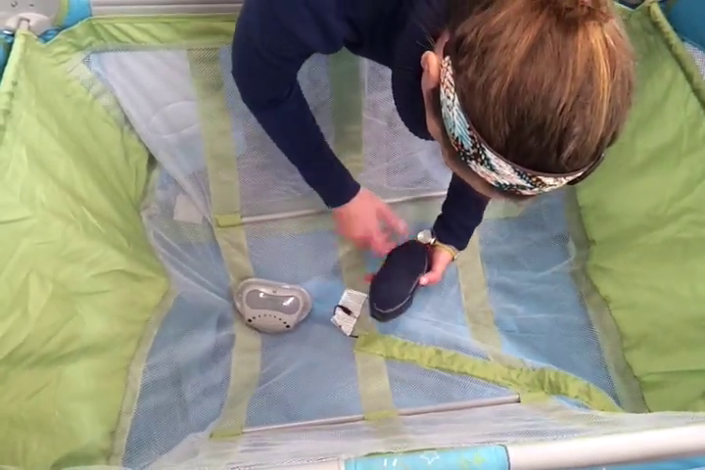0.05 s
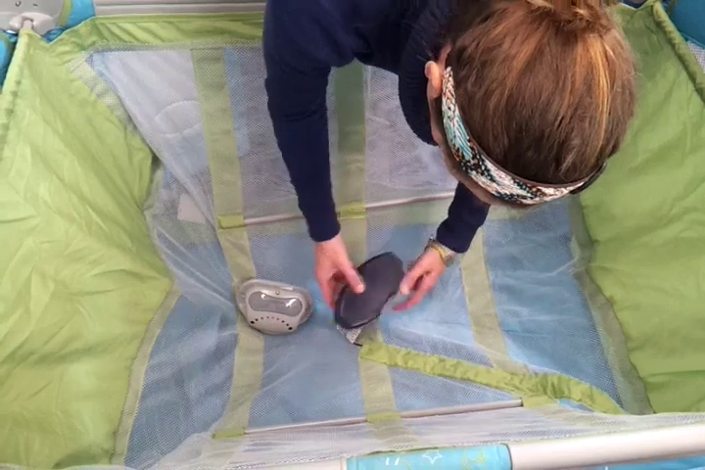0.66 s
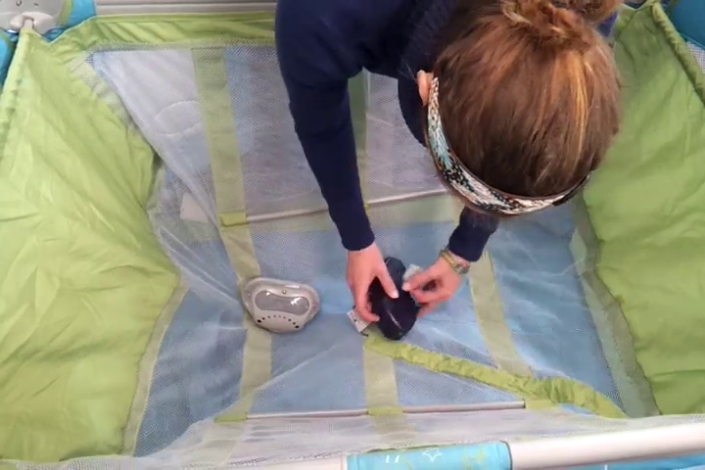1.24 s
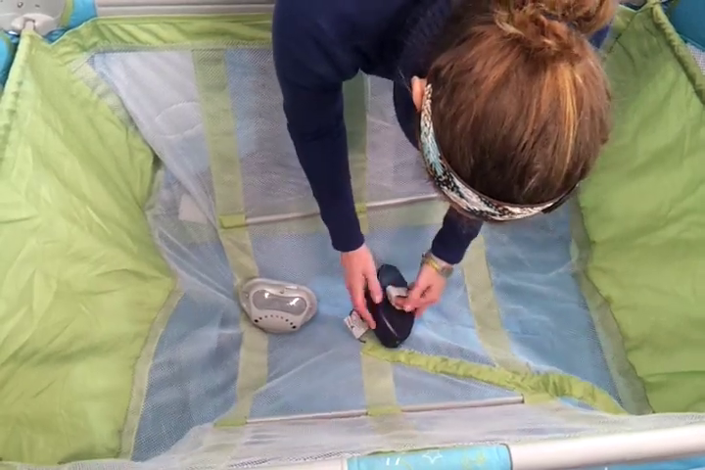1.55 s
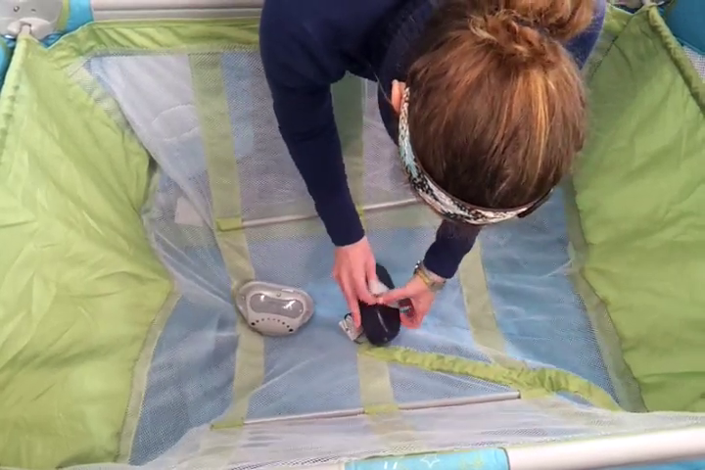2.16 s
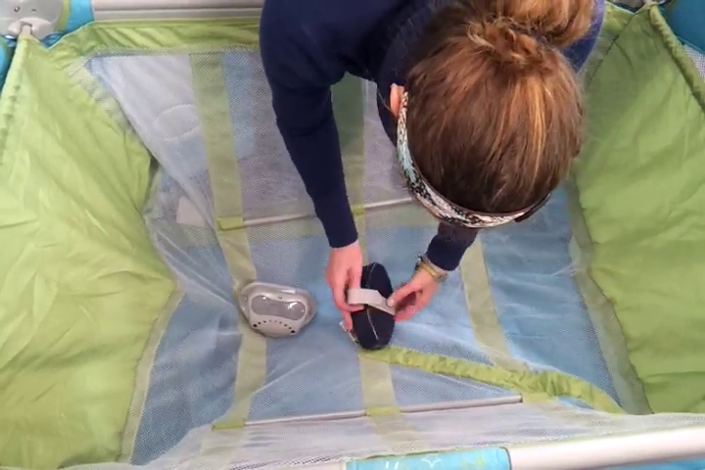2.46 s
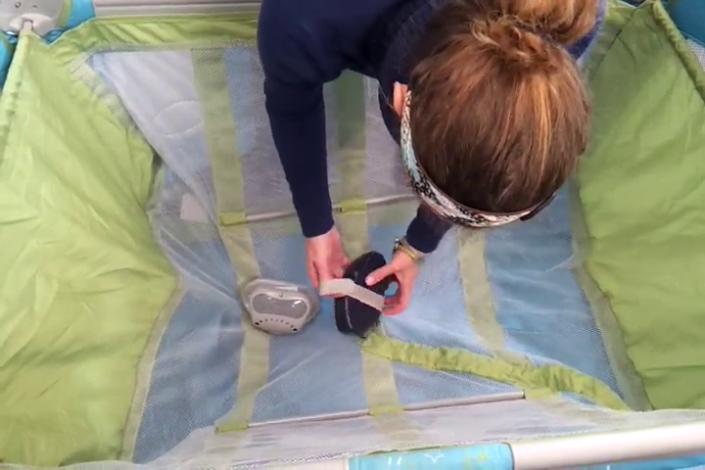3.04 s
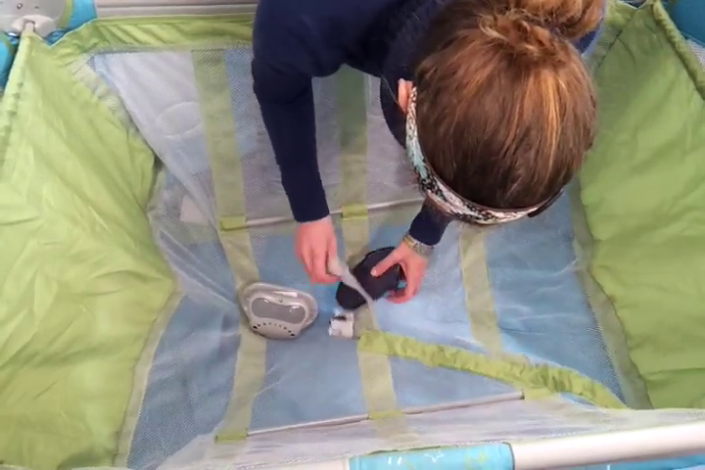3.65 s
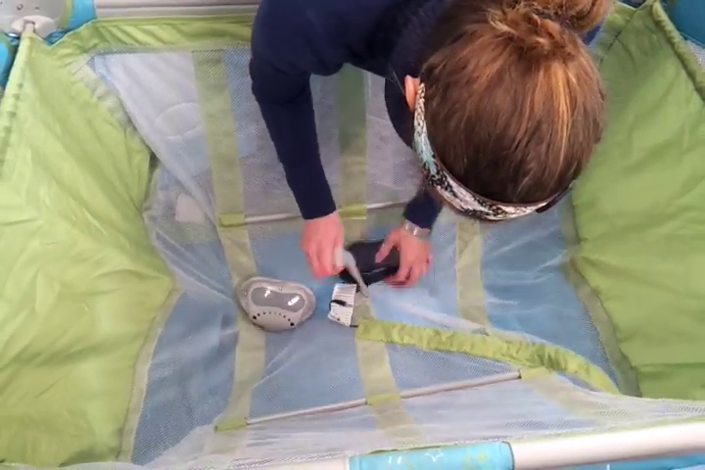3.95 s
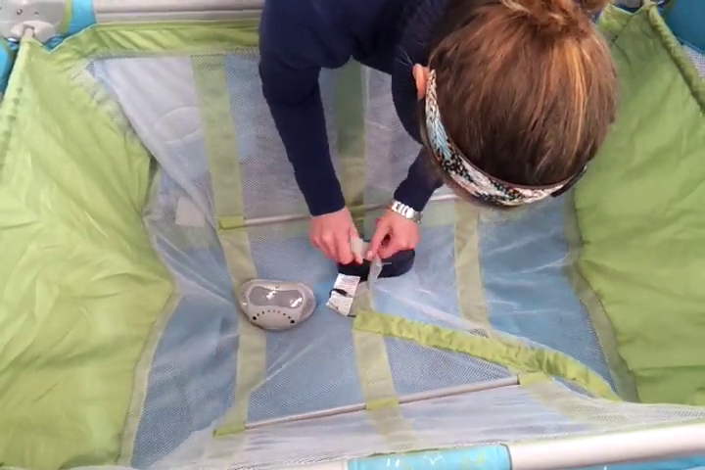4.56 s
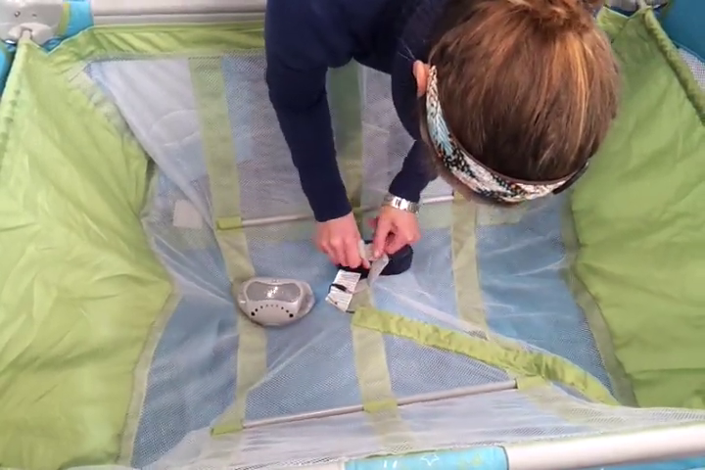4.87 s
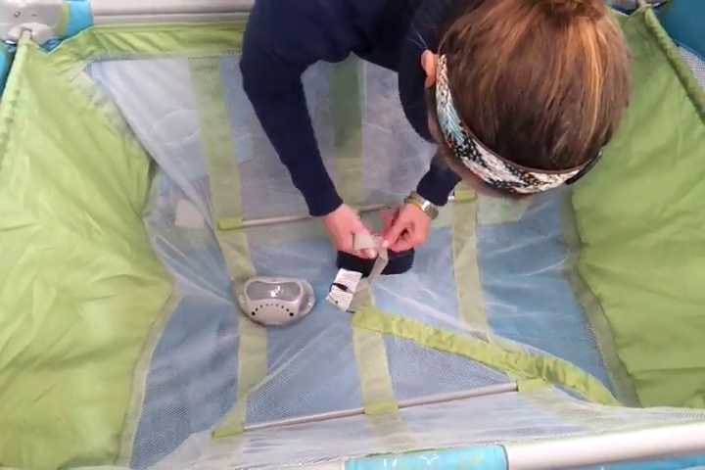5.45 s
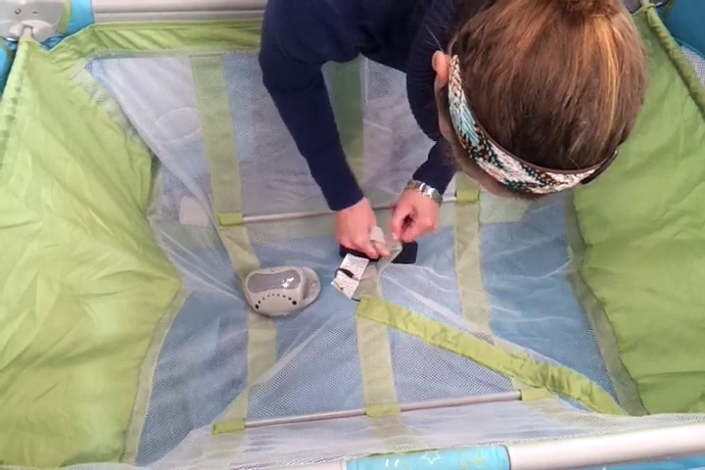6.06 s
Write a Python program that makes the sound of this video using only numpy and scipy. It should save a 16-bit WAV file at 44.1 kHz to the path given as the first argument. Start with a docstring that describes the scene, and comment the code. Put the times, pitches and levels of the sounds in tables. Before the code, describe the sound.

Dry crackles and short rips of a hook-and-loop strap being handled, with sleeve rustle and light taps in a bare room.

```python
"""A stiff fabric strap is threaded round a small gadget and fastened to the mesh base of a travel cot.
It catches and lets go in dry snaps over a grainy rub, and a hard pull rips whole patches loose.
Sleeves brush, fingers tap the hollow case, the case scuffs the base, and the taut base bobs a little.
A bare room rings after every snap; a fan hums and whines quietly behind."""
import sys
import numpy as np
from scipy import signal
from scipy.fft import rfft, irfft
from scipy.io import wavfile

SR = 44100
rng = np.random.default_rng(int(sys.argv[2]) if len(sys.argv) > 2 else 0)


def materialize(psi):
    """Save the field psi as 16-bit PCM at rate SR to the path in sys.argv[1].

    A 1-D psi becomes a single channel; in a 2-D psi each row is a channel.
    """
    bounded = np.clip(np.atleast_2d(psi).T, -1, 1)
    quanta = np.round(bounded * 32767).astype(np.int16)
    wavfile.write(sys.argv[1], SR, quanta)


N = 278271
TIME = np.arange(N) / SR

# how hard the hands work the strap: t/s, level/dB
HAND_EFFORT = [(0, -60), (.7, -60.5), (.95, -51.5), (1.3, -66), (1.75, -57), (2.1, -59.5), (2.6, -51.5),
               (3.1, -54), (3.55, -43), (4.2, -50.5), (4.35, -41), (5.1, -46), (5.45, -39.5), (5.68, -49.5),
               (6.0, -53), (6.31, -57)]
# the bright scratch of the strap's weave: f/Hz, level/dB
WEAVE_COLOUR = [(900, -18), (2000, -22), (3200, -5.5), (4100, -2.5), (4800, 0), (5600, 1.5), (6600, 2),
                (7300, -5), (9000, -21)]
# the strap's loud releases: t/s, level/dB, brightness/dB (upper resonances over lower)
STRAP_SNAPS = [(0.018, -32, -2), (0.457, -33.5, 5), (1.109, -37.5, 0), (1.195, -42.5, -9), (1.411, -30, 13),
               (1.89, -34, -14), (2.181, -35, 4), (2.408, -26, 0), (2.448, -30, 2), (2.485, -27, 9),
               (2.505, -23.5, 2), (2.51, -26, 7), (2.6534, -29, 0), (2.6946, -29, 5), (2.698, -24, 5.5),
               (2.716, -27, 6.5), (2.7773, -23.5, 0), (2.9357, -35, -10), (2.992, -33.5, -10),
               (3.012, -34.5, -1), (3.1032, -36, -3), (3.2537, -27, -4), (3.269, -30.5, -4),
               (3.317, -21.5, -9.5), (3.514, -19.5, -7.5), (3.770, -20, -9), (3.775, -21.5, -1),
               (3.797, -21, -8), (4.028, -26.5, -6), (4.102, -31.5, -16), (4.2457, -13.5, -11),
               (4.254, -26.5, 9), (4.258, -17, 2), (4.271, -18, 5), (4.281, -20, 7), (4.313, -19, -4),
               (4.337, -25, -9), (4.367, -24, -4), (4.3745, -20, -17), (4.383, -18.5, -6.5),
               (4.571, -22, -7.5), (4.5912, -27, -4), (4.674, -27, 2), (4.728, -20.5, 4), (4.750, -22, 1.5),
               (4.831, -25.5, 7), (4.845, -22, -1.5), (4.888, -23, 5), (4.903, -19.5, 4.5),
               (4.982, -28.5, 6), (4.988, -28.5, -8), (5.014, -27.5, 1), (5.1056, -26, 8.5),
               (5.174, -23, 4.5), (5.2643, -29, 4), (5.4459, -23, 1), (5.519, -28, 9), (5.551, -17, 2.5),
               (5.634, -26, 10), (5.746, -27, -2), (5.756, -21.5, -2), (5.841, -29.5, 10),
               (5.923, -28, 0.5), (6.149, -32.5, -6), (6.170, -25.5, 9), (6.2584, -29.5, 1)]


def from_db(db):
    return 10 ** (np.asarray(db) / 20)


def unit_rms(x):
    return x / np.sqrt(np.mean(x ** 2) + 1e-20)


def envelope(rows):
    """Joins (time, value) points into a curve, sample by sample."""
    return np.interp(TIME, *np.transpose(rows))


def at_hz(points, hz):
    """Reads a curve on a log-frequency axis."""
    freqs, values = np.transpose(points)
    return np.interp(np.log(np.maximum(hz, 1)), np.log(freqs), values)


def colour(x, spectrum):
    """Shapes a sound with a smooth EQ curve."""
    gain = from_db(at_hz(spectrum, np.arange(N + 1) * SR / (2 * N)))
    return irfft(rfft(x, 2 * N) * gain)[:N]


def drift(per_s):
    """A random wander through per_s new values a second."""
    knots = rng.standard_normal(4096)
    return np.interp(TIME * per_s, np.arange(len(knots)), knots)


def add(out, s, sound):
    """Mixes a sound in at time s."""
    start = int(np.clip(s * SR, 0, N - 1))
    out[start:start + len(sound)] += sound[:N - start]


def resonate(x, modes):
    """Broad resonances in parallel, signs alternating."""
    out = 0
    for k, (hz, width, db) in enumerate(modes):
        r = np.exp(-np.pi * width / SR)
        zeros = [(1 - r * r) / 2, 0, (r * r - 1) / 2]
        poles = [1, -2 * r * np.cos(2 * np.pi * hz / SR), r * r]
        out = out + (-1) ** k * from_db(db) * signal.lfilter(zeros, poles, x)
    return out


def strokes(rows):
    """The envelope of short hand movements: quick attack, slower fade."""
    shape = [0.0028, 0.99, 0.54, 0.0036]
    return sum(from_db(db) * np.interp(TIME, [s, s + length / 10, s + length / 2, s + length], shape)
               for s, length, db in rows)


def friction(spectrum, per_s, size_db, clump_db, hiss_db):
    """Threads flick over each other in clumps of grains above a smooth hiss; coloured, rms 1."""
    flicks = rng.random(N) < per_s * from_db(clump_db * drift(45)) / SR
    sizes = from_db(size_db * np.minimum(rng.exponential(1, N), 4)) * rng.choice([-1, 1], N)
    texture = unit_rms(flicks * sizes) + from_db(hiss_db) * rng.standard_normal(N)
    return unit_rms(colour(texture, spectrum))


def strap_rub(gain_db):
    """Cloth scratches on cloth, swelling as the hands work harder."""
    scratch = friction(WEAVE_COLOUR, per_s=600, size_db=3.5, clump_db=-2, hiss_db=-6)
    return scratch * from_db(envelope(HAND_EFFORT) + gain_db)


def sleeve_brush():
    """Skin and sleeves brush dully over the case and the base."""
    # the pressure of the brushing: t/s, level/dB
    pressure = [(0, -59.5), (1.2, -62), (1.6, -63.5), (2.1, -55.5), (3.0, -60.5), (3.3, -54.5),
                (3.95, -57.5), (4.75, -64.5), (5.4, -57.5), (6.31, -69)]
    # its soft tone: f/Hz, level/dB
    brush_colour = [(400, -13), (900, 5.5), (1400, -4), (1850, -1.5), (2600, -9.5), (4000, -9.5),
                    (7000, -30.5)]
    rustle = friction(brush_colour, per_s=1200, size_db=1, clump_db=2, hiss_db=-3.5)
    return rustle * from_db(envelope(pressure))


def fan(air_db, waver_rad, flutter):
    """A bed of moving air under motor tones that waver in pitch and level."""
    # the rush of air: f/Hz, level/dB
    air_colour = [(20, -7), (50, -4), (100, -6.5), (170, 0), (230, 1.5), (335, 2.5), (420, -1.5), (600, -4),
                  (920, -9.5), (1500, -9.5), (3000, -16), (5400, -13.5), (7000, -20), (9000, -31)]
    # the motor's hum and whine: f/Hz, level/dB
    motor_tones = [(188, -64.5), (273.5, -59.5), (362, -63.5), (468, -66), (737.5, -68), (780, -66),
                   (982, -69), (1247.5, -63), (2514, -78), (4168, -79)]
    out = from_db(air_db) * unit_rms(colour(rng.standard_normal(N), air_colour))
    for hz, db in motor_tones:
        amplitude = np.sqrt(2) * from_db(db) * (1 + flutter * drift(8))
        out += amplitude * np.sin(2 * np.pi * hz * TIME + waver_rad * drift(9))
    return out


def small_catches(usual_per_s=7, usual_effort_db=-49.5, above_db=7, spread_db=3.5, bright_spread_db=4):
    """Cues for faint random snaps, denser and stronger with effort; rows as in STRAP_SNAPS."""
    effort_db = envelope(HAND_EFFORT)
    per_s = usual_per_s * from_db(effort_db - usual_effort_db)
    onsets = np.flatnonzero(rng.random(N) < per_s / SR)
    size, brightness = rng.standard_normal((2, N))[:, onsets]
    levels_db = effort_db[onsets] + above_db + spread_db * size
    return np.transpose([TIME[onsets], levels_db, bright_spread_db * brightness]).tolist()


def strap_snaps(slip_s, slip_db, shiver_s, shiver_db, body_db, body_hz, detune, spread_db, gain_db):
    """Each snap is one sudden release, a few fibres slipping after it, then a weak shiver of the weave."""
    # the strap's lower resonances: f/Hz, width/Hz, level/dB
    lower_modes = [(2510, 1740, -20), (3190, 580, -11.5), (3704, 1000, -9), (4427, 930, 1), (5053, 816, 2)]
    # its upper resonances: f/Hz, width/Hz, level/dB
    upper_modes = [(5650, 610, -7), (6520, 460, -1.5), (7085, 694, -3.5)]
    out, t = np.zeros(N), TIME[:SR // 25]
    attack = slice(0, SR // 400)  # the first 2.5 ms set each layer's level
    fibres = from_db(slip_db) * (np.exp(-t / slip_s) + from_db(shiver_db) * np.exp(-t / shiver_s))
    body_band = signal.butter(1, [body_hz / 10, body_hz], "band", fs=SR, output="sos")
    for s, db, bright_db in STRAP_SNAPS + small_catches():
        slips = (t == 0) + rng.standard_normal((3, len(t))) * fibres
        # every snap comes from another spot of the strap, with resonances of its own
        lower, upper = ([(hz * (1 + detune * rng.normal()), width, mode_db + spread_db * rng.normal())
                         for hz, width, mode_db in modes] for modes in (lower_modes, upper_modes))
        layers = resonate(slips[0], lower), resonate(slips[1], upper), signal.sosfilt(body_band, slips[2])
        low, high, body = (layer / np.std(layer[attack]) for layer in layers)
        crack = low - from_db(bright_db) * high
        snap = crack / np.std(crack[attack]) + from_db(body_db) * body
        add(out, s, from_db(db + gain_db) * snap)
    return out


def base_thuds(centre_hz, t60_s, gain_db):
    """Each loud snap releases tension and lets the taut base bob: a short sub thud."""
    out, t = np.zeros(N), TIME[:SR // 2]
    for s, db, _ in STRAP_SNAPS:
        bob = np.sin(2 * np.pi * centre_hz * rng.uniform(.5, 1.5) * t)
        add(out, s, from_db(db + gain_db - 60 * t / t60_s) * bob)
    return out


def room(x, tail_db, early_db, early_s, gap_s):
    """Close reflections off the cot, then a diffuse tail that rings longest in the mids."""
    # the bare room's decay: f/Hz, t60/s
    decay_times = [(300, 0.2), (2000, 0.67), (4500, 0.44), (8000, 0.3)]
    t, hz = TIME[:SR], np.arange(SR // 2 + 1)
    white = rfft(rng.standard_normal(SR))
    tail = 0
    for band_hz, t60 in decay_times:
        band = at_hz([(f, f == band_hz) for f, _ in decay_times], hz)
        tail = tail + irfft(white * band, SR) * from_db(-60 * t / t60)
    early = rng.standard_normal(SR) * (rng.random(SR) < .03) * np.exp(-t / early_s)
    fade_in = np.clip(t / gap_s - 1, 0, 1)
    response = from_db(tail_db) * unit_rms(tail * fade_in) + from_db(early_db) * unit_rms(early * fade_in)
    return signal.fftconvolve(x, response / np.sqrt(SR))[:N]


def case_taps(scuff_s, scuff_db, gain_db):
    """A finger or the buckle knocks on the case and scuffs it for a moment."""
    # the knocks: t/s, relative level/dB
    hits = [(0.374, -46), (0.456, -36), (0.5397, -37), (0.873, -46), (0.958, -43), (1.0877, -39),
            (1.1955, -35.5), (2.2542, -33), (2.9595, -39.5), (3.467, -35.5), (4.025, -35), (4.988, -46),
            (5.385, -38.5), (6.194, -43)]
    # the case's resonances, damped by the hands: f/Hz, width/Hz, level/dB
    case_modes = [(720, 150, -15.5), (1210, 410, -7), (1866, 450, 0.5), (2460, 710, -4.5),
                  (3000, 500, -4.5), (4250, 400, -5.5), (5070, 1100, -8.5)]
    out, t = np.zeros(N), TIME[:SR // 20]
    for s, db in hits:
        force = (t == 0) + from_db(scuff_db) * rng.standard_normal(len(t)) * np.exp(-t / scuff_s)
        knock = resonate(force, case_modes)
        add(out, s, from_db(db + gain_db) * knock / np.abs(knock).max())
    return out


def strap_slides(gain_db):
    """The strap runs through the fingers in short, dense rasps."""
    # the pulls: t/s, length/s, relative level/dB
    pulls = [(0.456, 0.14, -46), (.67, 0.027, -47.5), (1.38, 0.04, -47.5), (1.888, 0.035, -43.5),
             (1.965, 0.017, -42.5), (2.01, 0.19, -45.5), (2.222, 0.025, -43), (2.36, 0.02, -46),
             (3.21, 0.083, -44.5), (3.285, 0.14, -39.5), (3.66, 0.048, -39), (4.01, 0.097, -42),
             (4.9, 0.02, -35.5), (5.235, 0.15, -43.5), (5.43, 0.18, -39.5), (6.05, 0.11, -46),
             (6.125, 0.063, -41.5)]
    rasp = friction(WEAVE_COLOUR, per_s=2700, size_db=4, clump_db=-3.5, hiss_db=-7.5)
    return from_db(gain_db) * strokes(pulls) * rasp


def case_drags():
    """The hollow case scuffs over the mesh base."""
    # the shoves: t/s, length/s, level/dB
    shoves = [(0.459, 0.12, -48.5), (2.238, 0.054, -53), (2.49, 0.046, -47.5), (2.83, 0.047, -51.5),
              (3.24, .08, -50), (3.313, 0.061, -40.5), (3.464, 0.041, -50)]
    # the boxy tone of the scuff: f/Hz, level/dB
    scuff_colour = [(200, -27), (480, -7.5), (690, 6.5), (950, -12), (1500, -3), (2400, -3), (3500, -7),
                    (7000, -29)]
    return strokes(shoves) * friction(scuff_colour, per_s=2000, size_db=-2, clump_db=8, hiss_db=-16)


def strap_rips():
    """A hard pull tears a patch loose: its tiny hooks let go within a few hundredths of a second."""
    # the tears: t/s, length/s, level/dB
    tears = [(3.77, 0.042, -33.5), (4.247, 0.06, -26), (4.31, 0.026, -31), (4.365, 0.041, -30)]
    # their harsh tone: f/Hz, level/dB
    tear_colour = [(700, -23), (1500, -10.5), (1850, -9.5), (2400, -3), (3200, 2), (3900, 1), (5000, -4),
                   (6000, -6), (7400, 1), (9000, -8.5)]
    return strokes(tears) * friction(tear_colour, per_s=1800, size_db=-3.5, clump_db=-0.5, hiss_db=-9.5)


def scene():
    """The handling feeds the room reverb; the thuds and the fan stay dry."""
    handling = strap_snaps(slip_s=0.0018, slip_db=-15.5, shiver_s=0.0084, shiver_db=-22.5,
                           body_db=-26, body_hz=1500, detune=0.043, spread_db=1.5, gain_db=0.5)
    handling += case_taps(scuff_s=0.0066, scuff_db=-21.5, gain_db=7)
    handling += strap_rub(gain_db=-3.5) + sleeve_brush() + strap_slides(gain_db=2)
    handling += strap_rips() + case_drags()
    reverb = room(handling, tail_db=-4.5, early_db=-14, early_s=0.0064, gap_s=0.00087)
    thuds = base_thuds(centre_hz=28, t60_s=0.11, gain_db=-24.5)
    return (handling + reverb + thuds + fan(air_db=-49.42, waver_rad=1, flutter=0.25))[None]


def record(dry):
    """The microphone rolls off early, and a steep low-pass cuts the top."""
    # the microphone's treble response: f/Hz, gain/dB
    mic_treble = [(6900, 0.5), (7500, -1), (8100, -11.5), (8500, -6), (9000, -23.5)]
    high_cut = signal.ellip(10, .1, 75, 9150, fs=SR, output="sos")
    return signal.sosfilt(high_cut, colour(dry[0], mic_treble)[None])


dry = scene()
out = record(dry)
materialize(out)
```